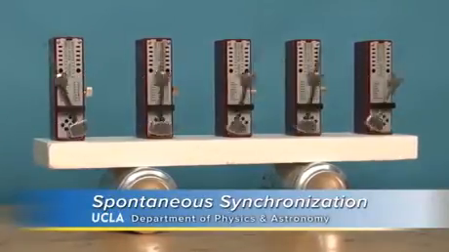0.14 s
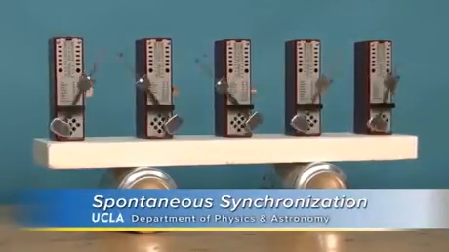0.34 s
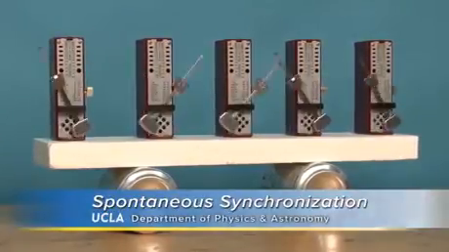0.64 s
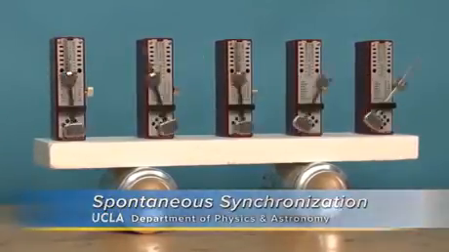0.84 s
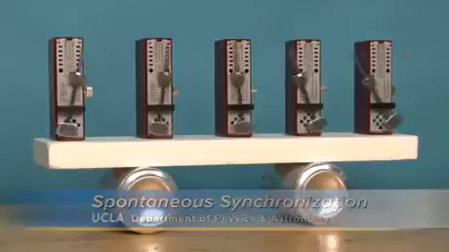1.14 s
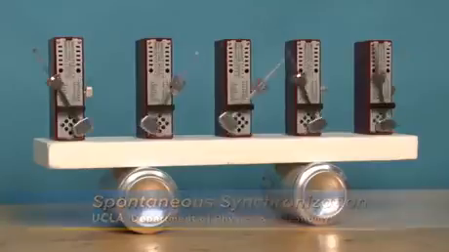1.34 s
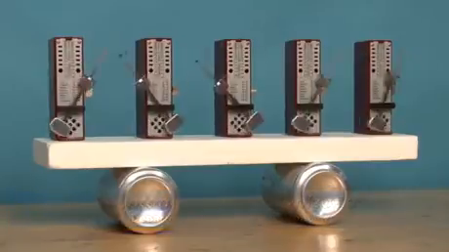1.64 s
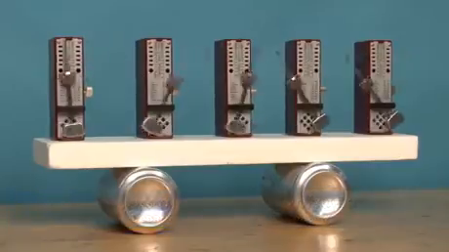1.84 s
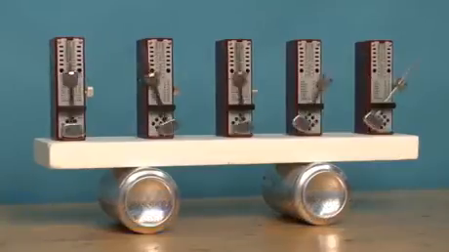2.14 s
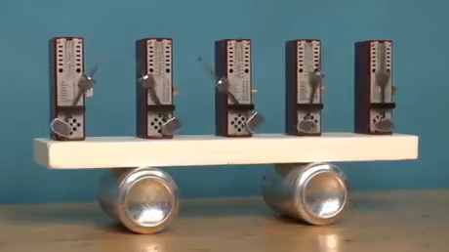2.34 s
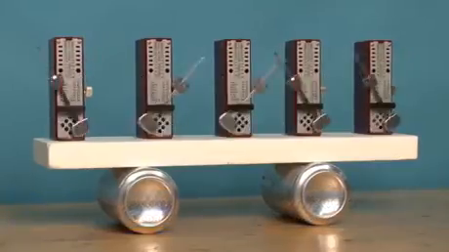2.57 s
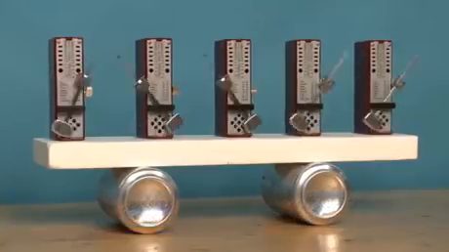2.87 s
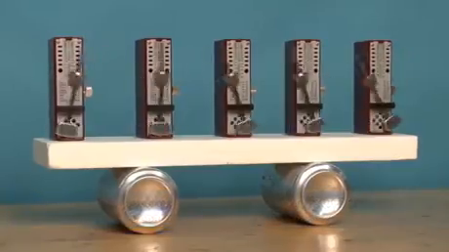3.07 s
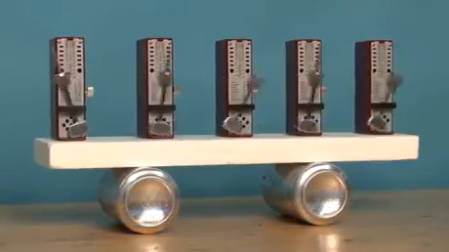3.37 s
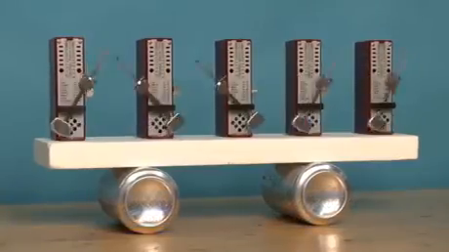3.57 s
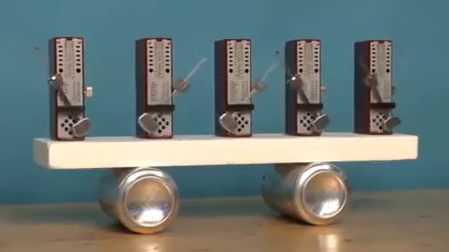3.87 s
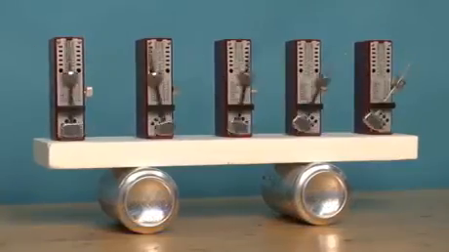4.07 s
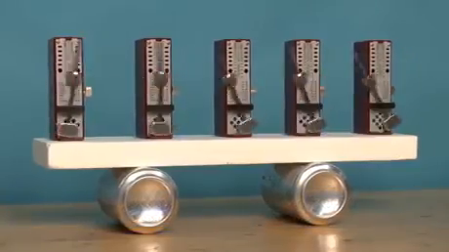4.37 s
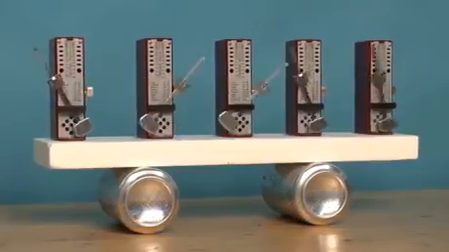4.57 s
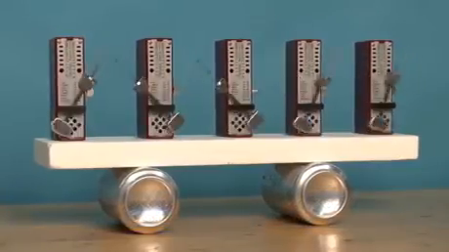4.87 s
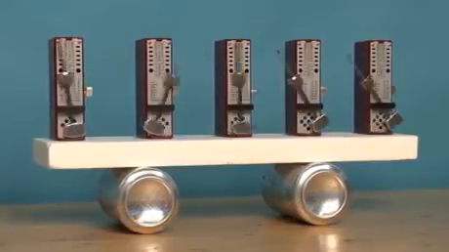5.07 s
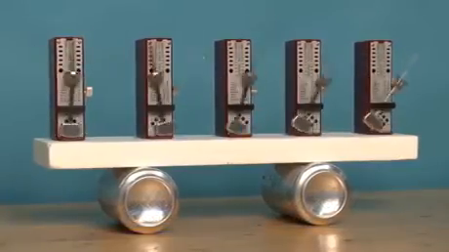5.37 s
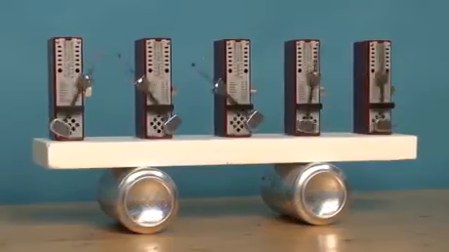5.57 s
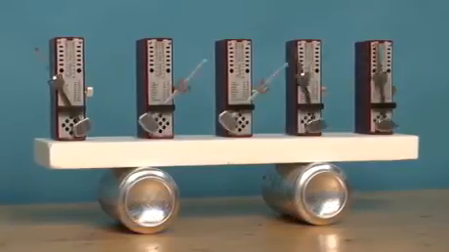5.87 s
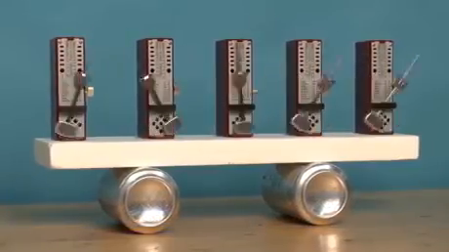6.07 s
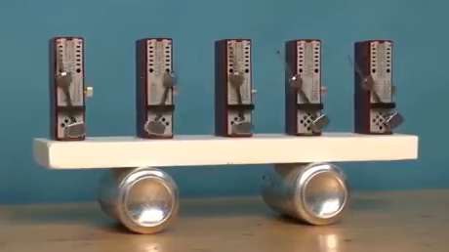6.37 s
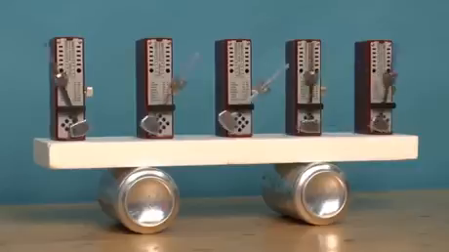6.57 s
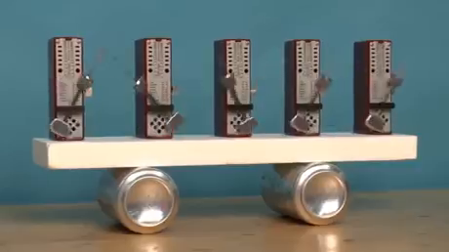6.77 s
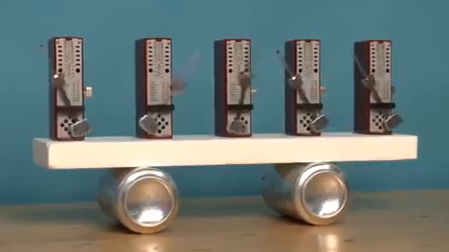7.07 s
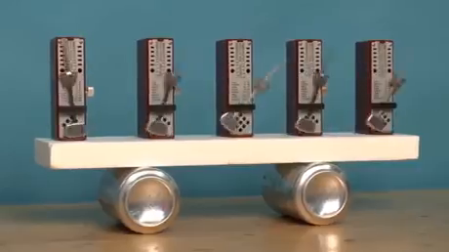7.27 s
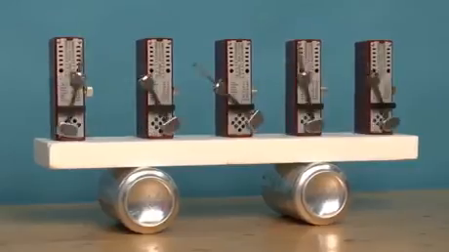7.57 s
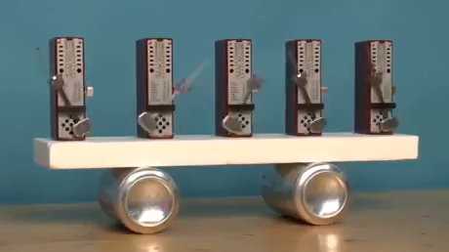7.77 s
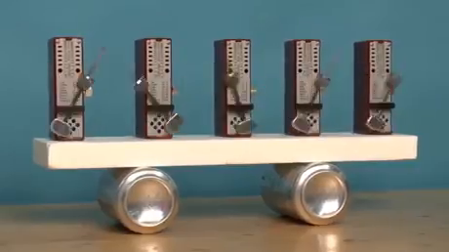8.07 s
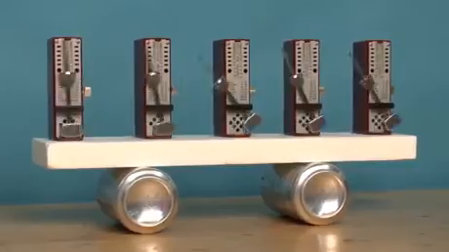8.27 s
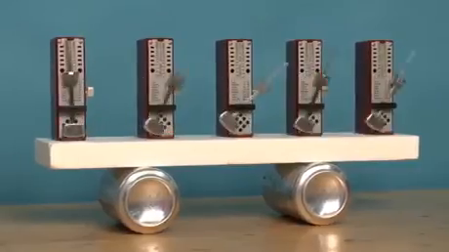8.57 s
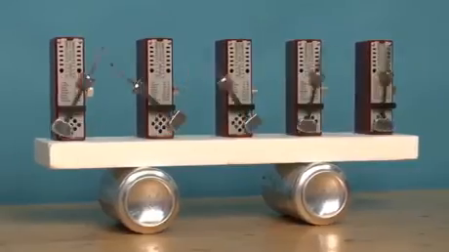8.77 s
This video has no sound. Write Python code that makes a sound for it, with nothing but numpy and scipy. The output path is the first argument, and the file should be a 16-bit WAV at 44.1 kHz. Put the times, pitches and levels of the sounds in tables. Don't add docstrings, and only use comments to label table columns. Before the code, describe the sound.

Five small wind-up metronomes tick together on a wooden board, each about three knocks a second. Their sharp plastic clacks fall slightly apart, making repeating ragged clusters whose pattern slowly shifts. A faint low board rumble fades within the first half second. Close stereo microphones in a small hard room, short bright reflections, hum and ventilation barely audible beneath.

```python
import sys
import numpy as np
from scipy import signal
from scipy.fft import rfft, irfft, next_fast_len
from scipy.io import wavfile
from scipy.ndimage import uniform_filter1d

SR = 44100
rng = np.random.default_rng(int(sys.argv[2]) if len(sys.argv) > 2 else 0)


def magnitude_from_level(level_db):
    exponent = np.asarray(level_db, float) / 20
    return 10 ** exponent


def log_audio(samples):
    frames = np.atleast_2d(samples).T
    limited = np.clip(frames, -1, 1)
    pcm = np.round(limited * 32767).astype(np.int16)
    wavfile.write(sys.argv[1], SR, pcm)


N = 392931

# f/Hz, level/dB per Hz
AIR_SPECTRUM = [(12, 6), (28, 5.5), (60, -6), (110, 11), (230, 6.5), (400, 7), (480, -6), (750, -21),
                (900, -55), (2000, -6), (4000, -13), (7000, -17.5), (12000, -27), (15000, -59)]
# f/Hz, likeness/0-1, left over right/dB
AIR_STEREO = [(25, 0.6, -7), (99, 1, 4), (240, 0.53, 2), (500, 0, -8.5), (2050, 1, 1)]
# f/Hz, level/dB rms
HUM_LINES = [(120, -64), (240, -76), (296, -78), (356, -81), (720, -82)]
# f/Hz, width/Hz, level/dB rms
DUCT_MODES = [(70.7, 10, -81.5), (151, 3.2, -75.5), (177.3, 4.9, -75.5), (210, 5.1, -78),
              (334.4, 12, -81.5), (437, 2.1, -86.5), (555.5, 11, -83)]
# f/Hz, width/Hz, level/dB
BOARD_MODES = [(153, 20, 5), (203, 31, 9), (275, 65, 9.5), (349, 35, -3), (413, 20, -27), (540, 55, -22),
               (774, 2.6, -1)]
# start t/s, let go t/s, level/dB
BOARD_PUSHES = [
    (-.1, 0.015, -47),
    (-.1, 0.096, -58),
    (0.208, 0.315, -56),
    (0.334, 0.525, -55),
]
# f/Hz, t60/s, colour/dB
ROOM_DECAY = [(510, 0.27, 13.5), (800, 0.22, 2.5), (1055, 0.26, -1.5), (2000, 0.35, 8.5), (3800, 0.3, 7),
              (7840, 0.28, 7.5), (15000, 0.21, 0.5)]
# f/Hz, side over mid/dB
ROOM_WIDTH = [(500, -1), (1500, -6), (3000, -19), (6000, -33), (15000, -10)]
# f/Hz, level/dB per Hz
WALL_SPECTRUM = [(350, -17), (640, -24), (726, -8), (843, -24), (1200, -0.5), (1560, -29.5), (1690, -12),
                 (1990, -3.5), (2340, -2), (3110, -4.5), (3420, -10.5), (3820, 0.5), (4310, -7), (5360, -6),
                 (15500, -29.5)]
# f/Hz, level/dB per Hz
CRACK_SPECTRUM = [(600, -30), (1500, -6), (3000, 2), (6000, 3.5), (8000, -6.5), (11000, -15), (15000, -16)]
# f/Hz, level/dB
MODES_1 = [(775, -14.5), (1055, -16.5), (1723, -12), (2078, -9), (2466, -6.0), (2638, -15), (2918, -7),
           (3187, -3.2), (3747, 0.9), (4102, -4), (4780, -25), (5373, -12.5), (6019, -10.5), (6535, -11),
           (7052, -9), (7795, -18), (8656, -27), (10013, -26), (10379, -23.5), (14449, -29.1)]
MODES_2 = [(743, -15.5), (1421, -15), (1647, -28), (1960, -3), (2239, -8.5), (2767, -3), (3155, -3.5),
           (3671, 1), (3962, 0.5), (4231, -21), (4823, -7.7), (5405, -6), (5620, -7), (6804, -8),
           (7666, -13), (9550, -31), (10174, -19), (12877, -28), (13512, -28), (14449, -26.5)]
MODES_3 = [(743, -16), (1389, -10.5), (1658, -11.5), (2121, 3.4), (2724, -0.5), (3467, -9.5), (3908, -5),
           (4188, -31), (4576, -29), (4780, -17), (5545, -21), (5997, -21.0), (6234, -18), (6923, -15),
           (7300, -20), (7569, -29), (8613, -21), (9873, -44), (10196, -41), (12662, -40)]
MODES_4 = [(732, -14), (1206, -12), (1410, -8), (2003, 2), (2821, -8.5), (4005, -4.5), (4436, -31),
           (4856, -19.2), (5276, -21), (5588, -27), (5739, -23), (6008, -25), (6277, -16.5), (6783, -16),
           (6977, -16.5), (7203, -22), (7504, -39), (8452, -23.5), (11143, -33), (11757, -35)]
MODES_5 = [(754, -16), (1367, -14.9), (2024, -1.5), (2724, 1.2), (3004, -16), (3445, -6), (3844, 1),
           (4145, -11), (4587, -22), (5308, -5.8), (6040, 2), (6385, -24), (6837, -9), (7138, -9.5),
           (7526, -15.2), (7924, -14), (9162, -16.5), (9959, -17), (11025, -21), (12059, -21)]
# direct trim/dB, crack/dB, room send/dB
SEAT_LEVELS = [(.1, -13, -2), (.1, -12.5, -2.5), (.1, -17, -3.5), (.1, -14, -2.5), (.1, -15, -4.5)]
# free ring t/s, near echo t/s, backdrop echo t/s
SEAT_PATHS = [(.0044, .008, .0138), (.0048, .0085, .0125), (.0038, .0075, .0152), (.003, .0058, .0138),
              (.0033, .0102, .0155)]
ECHO_LEVELS = (-15.5, -14)
SEAT_PANS = [0.17, .4, 0.51, -0.11, 0.055]
# first knock t/s, beat/ms at start, midway and end
PENDULUM_BEATS = [
    (-0.1117, 325.33, 323.61, 322.02),
    (-0.0648, 324.32, 323.41, 321.48),
    (-0.0323, 323.7, 326.0, 329.46),
    (-0.0082, 325.73, 328.01, 329.7),
    (0.0477, 322.01, 322.65, 322.62),
]
SWAY_LIMPS = [
    (-1.7, -2.0, -0.3, 1.6, 0.6),
    (0.0, -1.1, -3.2, -5.3, -3.0),
    (-1.0, -0.2, 1.4, 2.2, 1.7),
    (-2.0, -1.7, 0.5, 1.1, 0.3),
    (1.1, 3.9, 5.3, 0.9, -0.6),
]
# peak level/dB, tick over tock/dB
BLOW_LEVELS = [(-28.5, 0.5), (-29, -0.2), (-25, 0.25), (-27, 0.16), (-26, 0.1)]
# wobble/ms, beats a cycle, phase/turns
WHEEL_WOBBLES = [(.78, 3.85, .38), (.5, 3.6, .24), (.76, 4.0, .165), (.1, 3.15, .5), (.66, 5.3, .186)]

LEAD = 8820
KNOCKS = 28


def at_hz(points, hz, column=1):
    rows = np.array(points)
    return np.interp(np.log(np.maximum(hz, 1)), np.log(rows[:, 0]), rows[:, column])


def rms_one(x):
    return x / np.sqrt(np.mean(x ** 2) + 1e-20)


def coloured(x, spectrum):
    hz = np.fft.rfftfreq(x.shape[-1], 1 / SR)
    return irfft(rfft(x) * magnitude_from_level(at_hz(spectrum, hz)), x.shape[-1])


def pan(x, db):
    return x * magnitude_from_level(np.array([[db / 2], [-db / 2]]))


def bandpass(x, low, high):
    return signal.sosfilt(signal.butter(2, [low, high], "band", fs=SR, output="sos"), x)


def resonate(noise, modes):
    out = 0
    for hz, width_hz, db in modes:
        r = np.exp(-np.pi * width_hz / SR)
        poles = [1, -2 * r * np.cos(2 * np.pi * hz / SR), r * r]
        out = out + magnitude_from_level(db) * rms_one(signal.lfilter([1, 0, -1], poles, noise))
    return out


def air():
    size = next_fast_len(N)
    hz = np.fft.rfftfreq(size, 1 / SR)
    mid, side = rfft(rng.standard_normal((2, size))) * magnitude_from_level(at_hz(AIR_SPECTRUM, hz))
    alike = np.clip(at_hz(AIR_STEREO, hz), 0, 1)
    both = np.sqrt(1 + alike) * mid + np.sqrt(1 - alike) * side * [[1], [-1]]
    both = both * magnitude_from_level(at_hz(AIR_STEREO, hz, column=2) / 2 * [[1], [-1]])
    return magnitude_from_level(-68) * rms_one(irfft(both, size)[:, :N])


def hum():
    t = np.arange(N) / SR
    lines = 0
    for hz, db in HUM_LINES:
        lines = lines + np.sqrt(2) * magnitude_from_level(db) * np.sin(2 * np.pi * (hz * t + rng.random()))
    drone = resonate(rng.standard_normal((3, N)), DUCT_MODES)
    return pan(lines + drone[0] + 0.67 * drone[1:], -4.4)


def rumble():
    rise_db_per_s, fall_db_per_s = 306, 170
    body = resonate(rng.standard_normal((3, N)), BOARD_MODES)
    body = signal.sosfilt(signal.butter(6, 860, fs=SR, output="sos"), body)
    t = np.arange(N) / SR
    start_s, end_s, level_db = np.transpose(BOARD_PUSHES)[:, :, None]
    fade_db = rise_db_per_s * np.maximum(start_s - t, 0) + fall_db_per_s * np.maximum(t - end_s, 0)
    level = magnitude_from_level(np.max(level_db - np.minimum(fade_db, 99), axis=0))
    return level * rms_one(body[0] + 0.46 * body[1:])


def room_response():
    early_db, early_t60_s = 2.5, 0.065
    t = np.arange(SR // 2) / SR
    white = rng.standard_normal((2, 2, len(t)))
    clumps = uniform_filter1d(rng.standard_normal(len(t)), size=60) * np.sqrt(60)
    early = magnitude_from_level(2 * clumps) * magnitude_from_level(early_db - 60 * t / early_t60_s)
    edges = 300 * 2 ** np.arange(0, 6, .5)
    out = 0
    for k, (low, high) in enumerate(zip(edges, edges[1:])):
        mid, side = bandpass(white[k % 2], low, high)
        hz = np.sqrt(low * high)
        late = magnitude_from_level(-60 * t / at_hz(ROOM_DECAY, hz))
        side = side * magnitude_from_level(at_hz(ROOM_WIDTH, hz))
        colour = magnitude_from_level(at_hz(ROOM_DECAY, hz, column=2))
        out = out + colour * (late + early) * (mid + side * [[1], [-1]])
    arrival = np.clip((t - .0045) / .002, 0, 1)
    return rms_one(out * arrival) / np.sqrt(len(t))


def knocks(beat, limp_ms, blow, wheel):
    first_s, *beat_ms = beat
    peak_db, tick_db = blow
    wheel_ms, cycle, phase = wheel
    swing = np.linspace(0, 1, KNOCKS)
    turn = (-1.) ** np.arange(KNOCKS)
    gap_ms = np.interp(swing, np.linspace(0, 1, len(beat_ms)), beat_ms)
    late_ms = turn * np.interp(swing, np.linspace(0, 1, len(limp_ms)), limp_ms)
    late_ms = late_ms + wheel_ms * np.sin(2 * np.pi * (np.arange(KNOCKS) / cycle + phase))
    s = first_s + (np.cumsum(gap_ms) - gap_ms + late_ms) / 1000
    uneven_db = 1.11 * rng.standard_normal(KNOCKS)
    return list(zip(s, peak_db + turn * tick_db / 2 + uneven_db))


def case_modes(case, free_s, t):
    choke_db = -7
    hz, height_db = np.transpose(case)[:, :, None]
    t60 = 0.038 * (hz / 3000) ** -.4
    modes = magnitude_from_level(height_db - 60 * t / t60) / t60 * np.sin(2 * np.pi * (hz * t + rng.random(hz.shape)))
    modes = modes * (1 - np.exp(-t * hz / 1.2))
    late = t - free_s * np.clip(3500 / hz, .9, 3) ** .6
    modes = modes * magnitude_from_level(choke_db / (1 + np.exp(-late / .0005)))
    return modes / np.abs(modes.sum(axis=0)).max()


def wall_bursts(count, t):
    same, new = rng.standard_normal(len(t)), rng.standard_normal((count, len(t)))
    return rms_one(coloured((same + .6 * new) * magnitude_from_level(-60 * t / .015), WALL_SPECTRUM)) * .08


def metronome(ticks, case, seat, path, place_db):
    ahead_s, ahead_db = .002, -23.5
    capsule_side_db = -22.5
    trim_db, crack_db, room_db = seat
    free_s, *echo_s = path
    t = np.arange(2048) / SR
    modes = case_modes(case, free_s, t)
    cracks = rms_one(coloured(rng.standard_normal((len(ticks), len(t))), CRACK_SPECTRUM))
    cracks = cracks * magnitude_from_level(crack_db - 60 * t / 0.066)
    strengths = magnitude_from_level(1.3 * rng.standard_normal((len(ticks), len(case))))
    contact = np.minimum(t / 0.00036, 1)
    bursts = wall_bursts(len(ticks), t)
    direct, sent = np.zeros((2, N + LEAD + len(t)))
    for (s, peak_db), knock, burst in zip(ticks, strengths @ modes + cracks, bursts):
        start = round(s * SR) + LEAD
        direct[start:start + len(t)] += magnitude_from_level(peak_db + trim_db) * knock * contact
        sent[start:start + len(t)] += magnitude_from_level(peak_db) * burst
    direct = direct + magnitude_from_level(ahead_db) * np.roll(direct, -round(ahead_s * SR))
    direct = direct + sum(magnitude_from_level(db) * np.roll(direct, round(s * SR)) for s, db in zip(echo_s, ECHO_LEVELS))
    wet = signal.fftconvolve(sent[None], room_response(), axes=1)[:, :len(direct)]
    glint = bandpass(np.roll(direct, 7), 3000, 9000)
    direct = pan(direct, place_db) + magnitude_from_level(capsule_side_db) * glint * [[1], [-1]]
    small = signal.butter(4, 600, "high", fs=SR, output="sos")
    return signal.sosfilt(small, direct + magnitude_from_level(room_db) * wet)[:, LEAD:LEAD + N]


def scene():
    ticks = list(map(knocks, PENDULUM_BEATS, SWAY_LIMPS, BLOW_LEVELS, WHEEL_WOBBLES))
    cases = [MODES_1, MODES_2, MODES_3, MODES_4, MODES_5]
    tickers = sum(map(metronome, ticks, cases, SEAT_LEVELS, SEAT_PATHS, SEAT_PANS))
    return air() + hum() + rumble() + magnitude_from_level(-0.34) * tickers


def band_limit(x):
    return signal.sosfilt(signal.butter(12, 16660, fs=SR, output="sos"), x)


def record(dry):
    flutter_db, flutter_s = 6, .023
    treble = signal.butter(2, 1500, "high", fs=SR, output="sos")
    side = signal.sosfilt(treble, (dry[0] - dry[1]) / 2)
    chance = rng.standard_normal(2000)
    flutter = magnitude_from_level(flutter_db * np.interp(np.arange(N) / SR / flutter_s, np.arange(len(chance)), chance))
    wide = dry + (flutter - 1) * side * [[1], [-1]]
    top_cut = signal.cheby2(12, 60, 16450, fs=SR, output="sos")
    return band_limit(signal.sosfilt(top_cut, wide))


dry = scene()
out = record(dry)
log_audio(out)
```